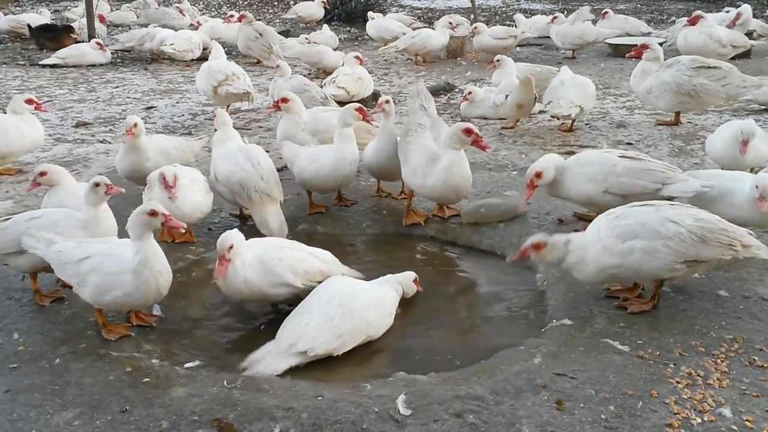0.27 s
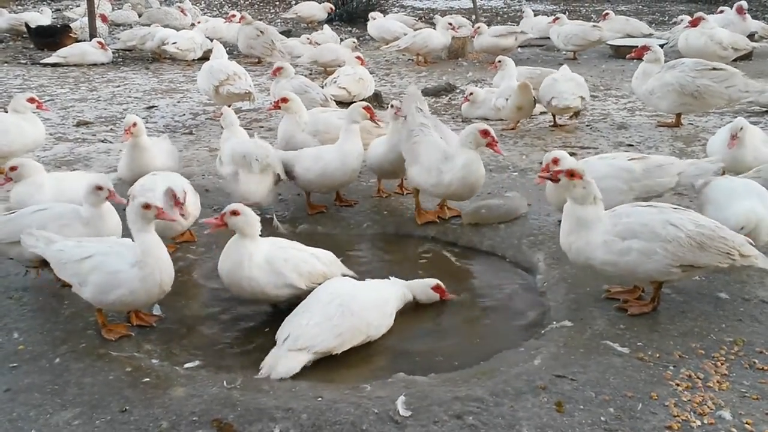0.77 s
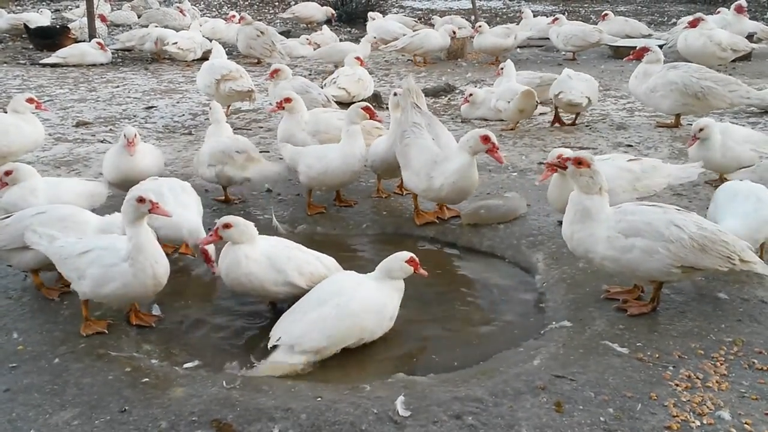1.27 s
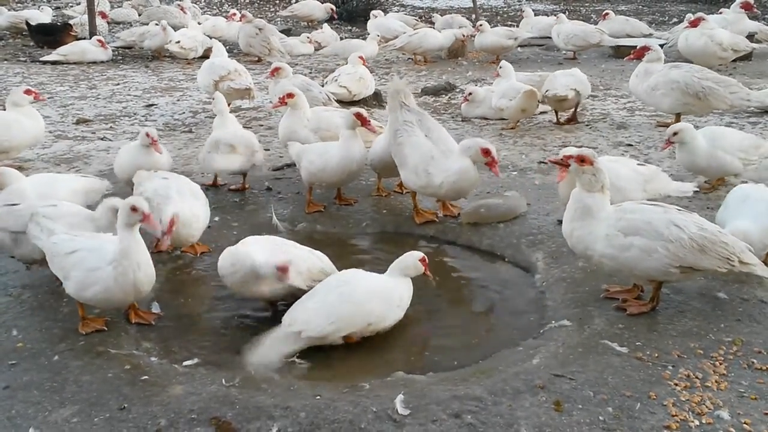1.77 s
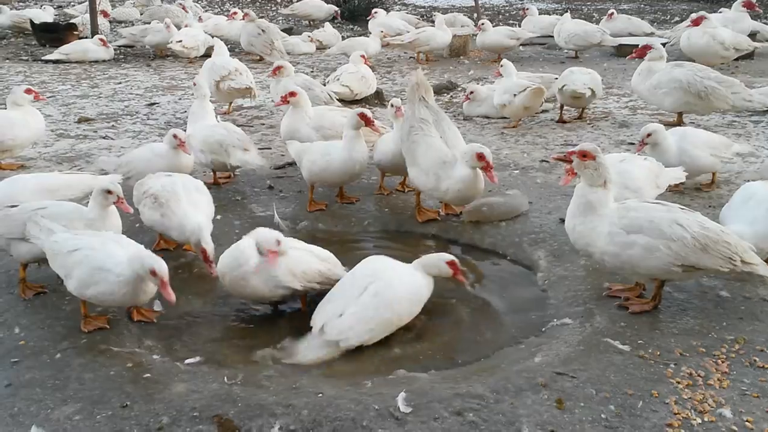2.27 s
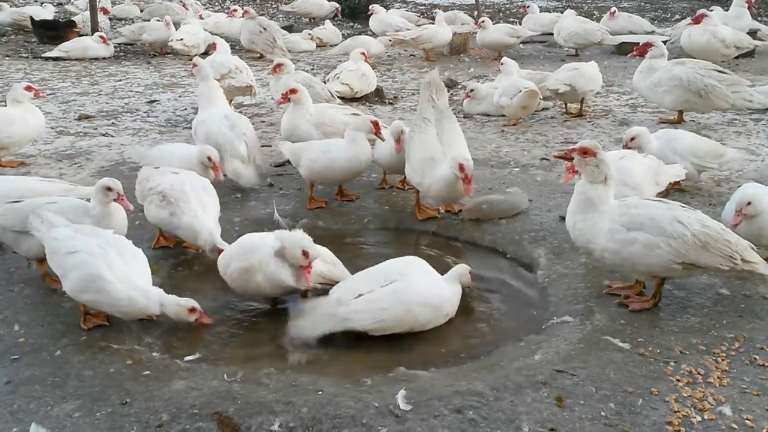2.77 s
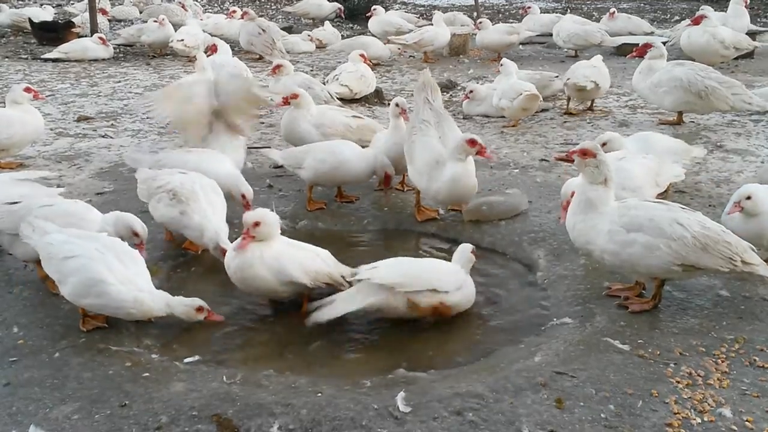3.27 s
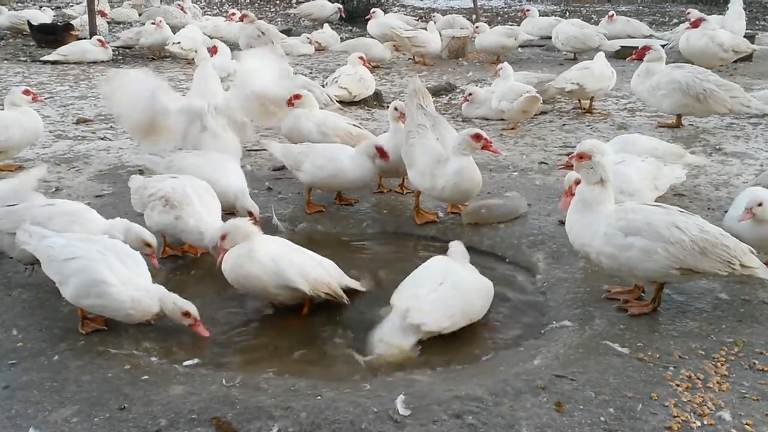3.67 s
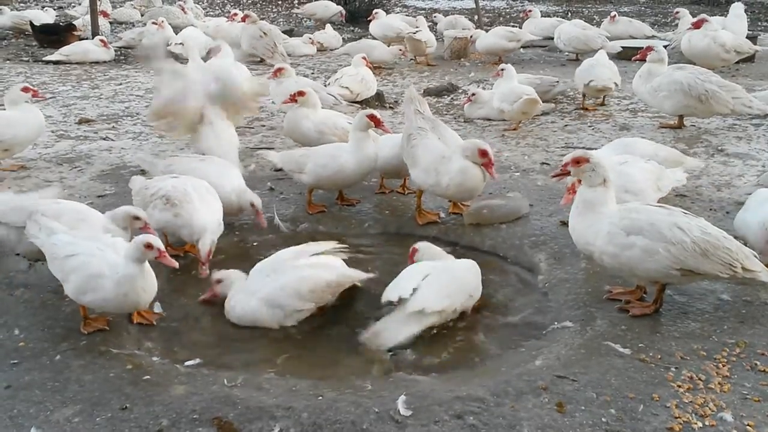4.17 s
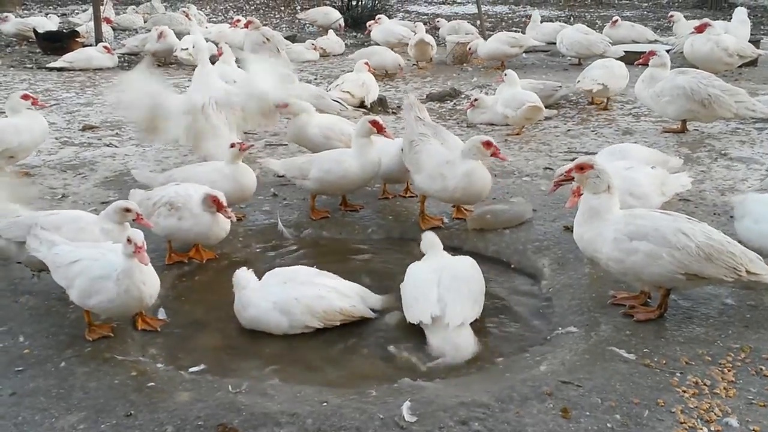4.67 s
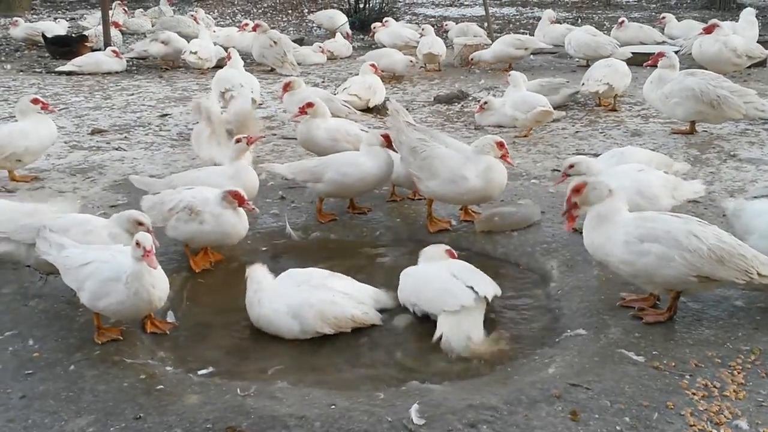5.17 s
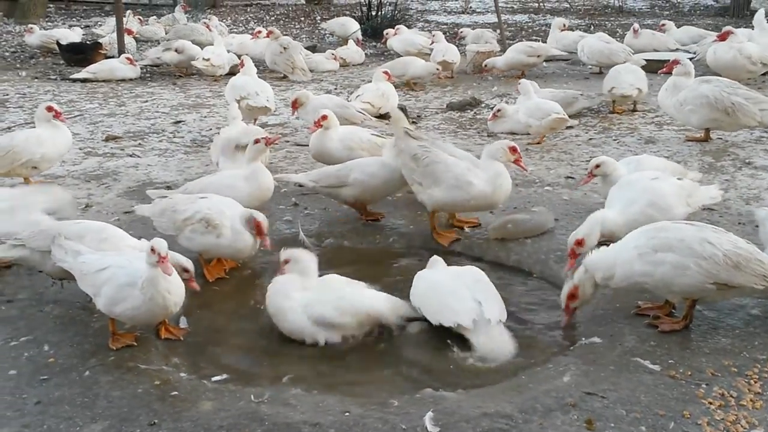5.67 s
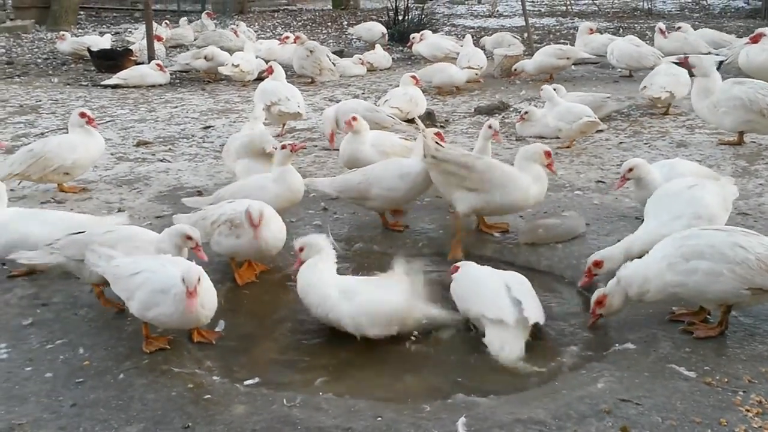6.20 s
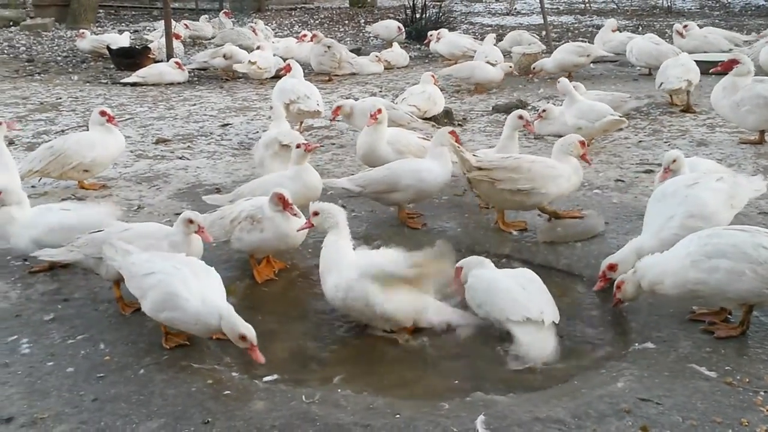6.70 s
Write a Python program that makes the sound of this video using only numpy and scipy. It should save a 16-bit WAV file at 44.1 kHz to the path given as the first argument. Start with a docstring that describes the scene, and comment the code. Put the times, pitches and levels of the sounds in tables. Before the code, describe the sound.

Sparse water ticks, tiny plops and soft wavering duck calls over a distant engine throb grow into flurries of splashing and regular bathing strokes.

```python
"""From the start drops tick, bubbles plop and feathers rustle as ducks dabble in a shallow farmyard puddle.
Ducks call softly with a few sliding overtones, and a far engine throbs as a sum of low orders.
From about 3.7 s wings puff low noise into the air and the engine slows; a quick flurry follows in the water,
where noise and swarms of ringing bubbles make the splashes. A rough drone swells near 5 s. From about 6.2 s
a duck bathes with regular wing strokes and the engine is back up to speed. Two ports colour the treble differently."""
import sys
import numpy as np
from scipy import signal
from scipy.fft import rfft, irfft, next_fast_len
from scipy.io import wavfile
from scipy.ndimage import map_coordinates

SR = 44100
rng = np.random.default_rng(int(sys.argv[2]) if len(sys.argv) > 2 else 0)


def transcribe(signal):
    """Save signal, clipped to [-1, 1], as a 16-bit WAV file at the path in sys.argv[1]."""
    frames = np.atleast_2d(signal).T
    limited = np.clip(frames, -1, 1)
    pcm = np.round(limited * 32767).astype(np.int16)
    wavfile.write(sys.argv[1], SR, pcm)


N = 306054
TIME = np.arange(N) / SR

# how hard the water is stirred: t/s, fine spray level/dB (before the mix)
STIR = [(0, -47.5), (.4, -51), (.85, -53), (1.2, -48), (1.45, -50), (2.1, -45.5), (2.5, -48), (2.85, -45.5),
        (3.2, -46.5), (4.0, -39.5), (4.35, -36.5), (4.65, -37.5), (4.92, -36), (5.12, -44), (5.38, -41),
        (5.65, -41), (6.05, -39), (6.6, -35), (6.94, -40)]
# wing strokes of the bath: t/s, length/s, spray/dB, smack/dB, thump/dB, falling water/dB (before the mix)
BATH = [(6.192, 0.026, -38, -30, -38.5, -38), (6.317, 0.01, -22.5, -29, -43.5, -42),
        (6.424, 0.014, -29, -33, -35.5, -30), (6.53, 0.024, -30.5, -29, -37.5, -35),
        (6.642, 0.02, -26.5, -23, -38, -38), (6.75, 0.0099, -25.5, -25.5, -33, -28),
        (6.861, 0.0061, -18, -28, -33, -30)]


def amp(db):
    """Level law: 20 dB is a factor of ten in amplitude."""
    return 10 ** (np.asarray(db) / 20)


def unit(x):
    """Normalisation to an effective (rms) value of 1."""
    return x / np.sqrt(np.mean(x ** 2) + 1e-20)


def curves(rows):
    """Linear interpolation: one value per sample for each column after the time."""
    s, *cols = np.transpose(rows)
    return [np.interp(TIME, s, c) for c in cols]


def wobble(rate):
    """Band-limited random modulation: a smooth curve through rate random knots a second."""
    coarse = TIME[::8]
    knots = rng.standard_normal(int(N * rate / SR) + 4)
    return np.interp(TIME, coarse, map_coordinates(knots, [coarse * rate]))


def bell(s, width):
    """Gaussian swell around time s with a standard deviation of width seconds."""
    return np.exp(-np.minimum(((TIME - s) / width) ** 2 / 2, 20))


def coloured(x, points):
    """Minimum-phase filtering: folding the cepstrum makes the response f/Hz, gain/dB causal."""
    m = 8192
    hz, db = np.transpose(points)
    gain_db = np.interp(np.log(np.fft.rfftfreq(m, 1 / SR) + 1), np.log(hz), db)
    cepstrum = irfft(np.log(amp(gain_db)))
    cepstrum[1:m // 2] *= 2
    cepstrum[m // 2 + 1:] = 0
    kernel = irfft(np.exp(rfft(cepstrum)))
    return signal.oaconvolve(x, np.broadcast_to(kernel, x.shape[:-1] + (m,)), axes=-1)[..., :N]


def noise(side_db):
    """Mid-side stereo: the level of the difference signal sets the width of white noise."""
    mid, side = rng.standard_normal((2, N))
    side = amp(side_db) * side
    return unit(np.array([mid + side, mid - side]))


def bubbles(start, size, hz, cycles, rise, lag, count):
    """Damped resonance: bubbles ring, rise in pitch and decay over some cycles, with a lag between the ports."""
    apart = lag * rng.standard_normal(len(start))
    first = (np.maximum(start - abs(apart), 0) * SR).astype(int)
    index = first[:, None] + np.arange(count)
    out = []
    for arrival in (start - apart / 2, start + apart / 2):
        turns = np.maximum(index / SR - arrival[:, None], 0) * hz[:, None]
        age = turns / np.reshape(cycles, (-1, 1))
        glide = 1 + rise * np.minimum(age, 2)
        envelope = np.exp(-age) * (1 - np.exp(-turns))
        ring = np.sin(2 * np.pi * turns * glide) * envelope
        out.append(np.bincount(index.ravel(), (size[:, None] * ring).ravel(), N)[:N])
    return np.array(out)


def swarm(rate, low_hz, high_hz, cycles, spread_db, lag, count):
    """Random superposition: a steady stream of bubbles, many faint and a few strong, of rms 1."""
    when, pitch, life, strength = rng.random((int(rate * N / SR), 4)).T
    size = amp(-spread_db * np.log(strength + .015))
    hz = low_hz * (high_hz / low_hz) ** pitch
    return unit(bubbles(when * N / SR, size, hz, cycles * (.5 + life), 0.013, lag, count))


def yard(x, t60, wet_db):
    """Diffuse reverberation: ground, birds and sheds scatter a tail that falls 60 dB in t60 seconds."""
    t = np.arange(SR // 2) / SR
    tail = rng.standard_normal((2, len(t))) * amp(-60 * t / t60) * (t > .0015)
    scattered = signal.fftconvolve(x, tail / np.linalg.norm(tail[0]), axes=1)[:, :N]
    return x + amp(wet_db) * scattered


def air():
    """Stationary filtered noise: the steady background of the yard."""
    # colour of the background: f/Hz, relative level/dB
    air_colour = [(15, 4), (35, -7), (55, 11), (100, 6), (180, 4.5), (300, -11), (550, -20), (1050, -4),
                  (1600, -28), (2600, -24), (7000, -30), (15000, -21)]
    return amp(-50.0) * unit(coloured(noise(side_db=-16), air_colour))


def engine():
    """Harmonic synthesis: low orders carry far; the second throbs, the next two swell and fade separately."""
    # speed of the distant engine: t/s, firing f/Hz
    speed = [(0, 40.7), (1.3, 41), (2.4, 40.2), (3.7, 40.4), (4.05, 34.8), (4.65, 32.9), (5.55, 34.4),
             (6.2, 41.2), (6.94, 41.8)]
    # how well it carries: t/s, level/dB (against usual_db), depth of the slow throb/dB
    reach = [(0, -49, 5.5), (.7, -49.5, 5), (1.3, -48.5, 8.5), (1.8, -49, 5.5), (2.4, -44.5, 4),
             (3.0, -48, 8), (3.28, -43.5, -4.5), (3.72, -62, 15), (4.1, -44.5, 0), (5.6, -51, -2),
             (5.95, -44.5, -4), (6.5, -43.5, 3.5), (6.94, -49.5, -3)]
    # third order: t/s, level/dB
    third_order = [(.2, -45), (.35, -55), (1.55, -54), (1.8, -43.5), (2.25, -53), (2.5, -46.5), (2.7, -52),
                   (3.15, -45), (3.6, -55)]
    # fourth order: t/s, level/dB
    fourth_order = [(0, -49), (1.15, -57), (1.33, -43.5), (1.58, -45), (2.25, -57), (2.95, -48), (3.9, -56),
                    (6.2, -51)]
    usual_db, second_order_db = -48, -45.5
    throb_period_s, throb_peak_s = .565, .14
    hz, = curves(speed)
    level_db, depth_db = curves(reach)
    throb = np.cos(2 * np.pi * (TIME - throb_peak_s) / throb_period_s)
    second_db = second_order_db + level_db - usual_db + depth_db * throb
    phase = 2 * np.pi * np.cumsum(hz * (1 + 0.0026 * wobble(14))) / SR
    # orders two to seven
    levels = [second_db] + curves(third_order) + curves(fourth_order) + [-66, -63, -62]
    return sum(amp(db + 1.2 * wobble(10)) * np.sin(order * phase) for order, db in enumerate(levels, 2))


def bath():
    """Impact and fallback: each wing slap is followed by falling water, as t, length, spray, smack, thump."""
    delay_s, length_s = 0.011, 0.026
    under_db = (-1, -18)  # smack and thump of the falling water, relative to its spray
    rows = []
    for *stroke, fall_db in BATH:
        rows.append(stroke)
        rows.append((stroke[0] + delay_s, length_s, fall_db, *np.add(under_db, fall_db)))
    return rows


def slaps(attack, release):
    """Energy addition: powers of spray, smack and thump sum as each slap starts sharply, lasts and decays."""
    # slaps of body, foot or wing: t/s, length/s, spray/dB, smack/dB, thump/dB (before the mix)
    splash_rows = [(0.029, .003, -31, -33, -64), (0.107, 0.0043, -56, -34, -65),
                   (2.026, 0.061, -37.5, -41.5, -76), (2.094, 0.0096, -22, -24.5, -54),
                   (2.143, 0.0091, -63, -38, -58), (2.167, 0.0042, -61, -34.5, -63),
                   (2.789, .025, -37.5, -40, -65), (2.947, 0.0055, -53, -34, -62),
                   (2.995, 0.0056, -64, -34, -52), (3.261, 0.016, -37.5, -35, -52),
                   (3.311, 0.0053, -41, -33, -63), (3.355, 0.032, -35.5, -35, -62),
                   (3.51, 0.022, -44, -41, -50), (3.715, 0.007, -30, -32, -42.5),
                   (4.099, 0.028, -39, -38.5, -43.5), (4.173, 0.0074, -30, -28, -40),
                   (4.194, 0.0093, -31, -29, -55), (4.265, 0.023, -38, -37, -53),
                   (4.293, 0.0064, -26, -33.5, -38.5), (4.342, 0.019, -33.5, -37, -41),
                   (4.392, 0.0073, -31, -39, -36.5), (4.462, 0.036, -35.5, -31, -46.5),
                   (4.53, 0.0083, -21, -27, -32.5), (4.578, 0.01, -34, -33.5, -39.5),
                   (4.643, 0.01, -26, -36, -40), (4.713, 0.0088, -25.5, -26, -38),
                   (4.767, 0.018, -32, -35.5, -43), (4.827, 0.013, -28.5, -31.5, -41),
                   (4.866, 0.032, -31, -35.5, -43), (4.938, 0.034, -33.5, -39, -52),
                   (4.98, 0.0034, -33, -25.5, -44), (5.013, 0.016, -31.5, -35, -43),
                   (5.083, 0.013, -32, -35, -40), (5.156, .022, -37.5, -51, -47.5),
                   (5.218, 0.0091, -31, -40, -42), (5.298, 0.0099, -34.5, -37.5, -49),
                   (5.354, 0.0099, -37, -52, -46), (5.626, 0.01, -32, -38, -56),
                   (5.851, 0.029, -35, -34, -57), (6.028, 0.01, -61, -30.5, -60),
                   (6.081, 0.0028, -46, -32, -29), (6.111, 0.01, -32.5, -43, -42)]
    power = np.zeros((3, N))
    for s, length, *levels in [*splash_rows, *bath()]:
        near = slice(max(int((s - .01) * SR), 0), int((s + .15) * SR))
        t = TIME[near] - s
        onset = np.clip(t / attack, 0, 1)
        decay = np.exp(-np.maximum(t - .7 * length, 0) / (release + .35 * length))
        power[:, near] += (amp(levels)[:, None] * onset * decay) ** 2
    return power


def water():
    """Bubble and turbulence noise: stirring and slaps throw spray, shake up bubbles and push the water below."""
    # deep churning: t/s, level/dB (before the mix)
    churn_rows = [(0, -57), (2.5, -57), (3.7, -54), (4.15, -46.5), (4.6, -44), (4.92, -44.5), (5.15, -55),
                  (6.3, -46), (6.94, -50)]
    # fine spray: f/Hz, relative level/dB
    spray_colour = [(1200, -33.5), (2700, -3), (3800, -9), (6500, 7), (9000, 1), (15000, -5)]
    # sloshing with larger bubbles: f/Hz, relative level/dB
    slosh_colour = [(300, 3.5), (650, -2), (1100, 4.5), (1900, 9), (2600, 7), (4500, -4.5)]
    # hollow smack of a slap: f/Hz, relative level/dB
    smack_colour = [(250, -37), (560, -2.5), (800, -1), (1100, 4.5), (1900, 1), (2600, -5), (4500, -9.5)]
    # deep push of the water: f/Hz, relative level/dB
    thump_colour = [(40, -36), (110, 4.5), (200, -1), (340, 1.5), (470, -4.5), (600, -0.5), (850, -12.5),
                    (1800, -25.5)]
    # water where the bathing duck sits: f/Hz, gain/dB
    bath_colour = [(2200, -0.5), (2700, -5.5), (3300, 0.5), (8000, 2), (9000, -6), (9900, 0.5)]
    bath_turn_s = (5.3, 6.1)  # the bath colour takes over during this span

    spray_db, churn_db = curves(STIR) + curves(churn_rows)
    # sloshing lies under the spray at a middling stir and grows more slowly
    stir_mid_db, slosh_under_db, slosh_grows = -48.5, -11.5, 0.79
    slosh_db = stir_mid_db + slosh_under_db + slosh_grows * (spray_db - stir_mid_db)
    # the bathing duck settles in before its first stroke and keeps the water sloshing
    bath_slosh_db, bath_lead_s = 5.5, 0.59
    slosh_db = slosh_db + bath_slosh_db * np.clip(1 + (TIME - BATH[0][0]) / bath_lead_s, 0, 1)

    ticks = swarm(rate=550, low_hz=3200, high_hz=12500, cycles=3.2, spread_db=4.7, lag=.00005, count=160)
    ticks = unit(coloured(ticks + amp(-3) * noise(side_db=8), spray_colour))
    sheet = swarm(rate=3200, low_hz=3000, high_hz=12400, cycles=4, spread_db=4.3, lag=.00004, count=96)
    sheet = unit(coloured(sheet + amp(-2) * noise(side_db=-2), spray_colour))
    gurgle = swarm(rate=800, low_hz=650, high_hz=2400, cycles=3.8, spread_db=3.2, lag=.00006, count=560)
    gurgle = unit(coloured(gurgle + amp(2) * noise(side_db=-4), slosh_colour))
    smack = unit(coloured(noise(side_db=-6.5), smack_colour))
    churn, thump = (unit(coloured(noise(side_db=-10.5), thump_colour)) for _ in range(2))

    # as the water gets busier, separate ticks merge into a sheet of spray
    merged = np.clip((spray_db + 53) / 14, 0, .85)
    patter = np.sqrt(1 - merged) * ticks + np.sqrt(merged) * sheet
    # water falls back in clumps, and a slapped sheet tears into brief bursts
    clumps = unit(amp(2.3 * wobble(150)))
    bursts = unit(amp(3 * wobble(650)))
    stirred = clumps * (amp(spray_db - 3.0) * patter + amp(slosh_db + 5.0) * gurgle)
    stirred = stirred + amp(churn_db + 0.5) * churn
    spray_slap, smack_slap, thump_slap = np.sqrt(slaps(attack=.0015, release=.002))
    slapped = bursts * (amp(-6.0) * spray_slap * sheet + amp(-4.0) * smack_slap * smack)
    splash = stirred + slapped + amp(4.5) * thump_slap * thump
    bathing = np.interp(TIME, bath_turn_s, [0, 1])
    return (1 - bathing) * splash + bathing * coloured(splash, bath_colour)


def flock():
    """Random superposition: ducks farther back give faint arched calls, as curves of t, f, level."""
    calls_per_s, call_s, top_hz, level_db = 5, .11, 1080, -58
    when, pitch = rng.random((int(calls_per_s * N / SR), 2)).T
    start = when * (N / SR - call_s)
    base_hz = top_hz * (1 - .2 * pitch)
    arch = [(0, 1), (.5, 1.2), (1, 1)]  # part of the call, pitch factor
    return [[(s + part * call_s, hz * lift, level_db) for part, lift in arch]
            for s, hz in zip(start, base_hz)]


def whistles():
    """Source and filter: a narrow throat passes a few overtones around the sixth of a voice near 200 Hz."""
    # soft, undulating duck calls, one curve each: t/s, strongest overtone f/Hz, level/dB (before the mix)
    call_curves = [
        [(0, 1015, -45), (.04, 1217, -45), (.09, 1600, -45), (.125, 1580, -50), (.155, 1145, -40),
         (.19, 1620, -50)],
        [(.31, 1022, -39), (.335, 1287, -49), (.37, 1047, -45), (.42, 1210, -47.5), (.46, 1090, -51)],
        [(.55, 947, -52), (.595, 1422, -46), (.642, 1650, -45), (.68, 1520, -42), (.705, 1096, -47),
         (.733, 890, -43)],
        [(.65, 966, -57), (.685, 1070, -47), (.72, 956, -51)],
        [(.738, 990, -47), (.762, 1210, -40), (.783, 1100, -45.5), (.802, 1208, -42), (.822, 1110, -49),
         (.843, 1195, -44), (.862, 1030, -49), (.893, 1363, -47), (.917, 1233, -45), (.94, 1520, -48)],
        [(.952, 1120, -40), (.985, 1535, -57), (1.004, 1030, -41), (1.012, 990, -50), (1.03, 1188, -52),
         (1.07, 1325, -50)],
        [(1.19, 1000, -51), (1.245, 1260, -49), (1.272, 990, -45), (1.303, 1400, -49), (1.333, 1000, -48)],
        [(1.86, 1310, -55), (1.902, 950, -47), (1.945, 1330, -52), (1.98, 990, -55)],
        [(2.655, 1090, -73), (2.685, 993, -40), (2.705, 1120, -72)],
        [(2.96, 1120, -49), (2.99, 1226, -50), (3.03, 943, -39), (3.07, 1334, -55)],
        [(3.345, 1056, -58), (3.375, 1272, -41), (3.405, 1024, -49), (3.435, 1212, -48), (3.46, 1010, -51)],
        [(3.572, 1176, -42), (3.598, 1470, -42), (3.625, 1250, -57)],
    ]
    out = np.zeros(N)
    order = np.arange(4, 9)[:, None] / 6  # relative to the sixth overtone
    # the pitch wavers and trembles, and each overtone breaks up in its own way
    quaver = 1 + .012 * wobble(70) + .012 * wobble(260)
    husk = unit(amp(2.4 * np.array([wobble(90) for _ in order]) + 1.3 * wobble(300)))
    # a faint rasp and octave lie beside the strongest overtone
    rasp = amp(-13) * wobble(600)
    octave_db = -25
    for call in [*call_curves, *flock()]:
        s, pitch, level = np.transpose(call)
        on = slice(max(int(s[0] * SR), 0), int(s[-1] * SR))
        t = TIME[on]
        hz, db = np.interp(t, s, pitch), np.interp(t, s, level)
        gate = np.clip(np.minimum(t - s[0], s[-1] - t) / 0.0023, 0, 1)
        throat = np.where(order == 1, 1, amp(-9) / (1 + ((order * hz - 1250) / 380) ** 4))
        phase = 2 * np.pi * np.cumsum(hz * quaver[on]) / SR
        partials = throat * husk[:, on] * np.sin(order * phase)
        voice = partials.sum(0) + rasp[on] * np.cos(phase) + amp(octave_db) * np.sin(2 * phase)
        out[on] += gate * amp(db - 0.5) * voice
    return np.array([out, out])


def drips():
    """Random arrivals: further drops fall at random from bills and feathers, harder in busier water."""
    drips_per_s, over_spray_db, scatter_db, mid_hz = 8, 12, 3, 6840
    when, pitch, strength = rng.random((int(drips_per_s * N / SR), 3)).T
    s = when * N / SR
    db = np.interp(s, *np.transpose(STIR)) + over_spray_db + scatter_db * (2 * strength - 1)
    return np.column_stack([s, db, mid_hz * (1 + .15 * (2 * pitch - 1))])


def drops():
    """Impact, then resonance: a drop ticks on the surface; its bubble pinches off and rings a millisecond or so."""
    # single drops, each trapping a tiny bubble: t/s, level/dB (before the gains below), bubble f/Hz
    drop_rows = [(0.011, -30, 4120), (0.0297, -11, 6140), (0.0473, -20, 6740), (0.1256, -22.5, 6700),
                 (1.0825, -16.5, 6700), (1.2346, -14.5, 6650), (1.268, -15.5, 7100), (1.307, -17, 7100),
                 (1.4571, -23.5, 7000), (1.9094, -18, 6800), (1.9711, -19, 7200), (2.111, -10.5, 6080),
                 (2.367, -15, 7270), (2.5243, -22.5, 6230), (2.7556, -20.5, 6700), (3.3203, -26.5, 3360),
                 (3.4538, -14, 6250), (3.5498, -18.5, 6100), (3.6005, -21.5, 6100), (3.63, -20.5, 5930),
                 (3.9045, -18.5, 6160), (4.6483, -20, 5880), (4.7173, -15.5, 7440), (5.0485, -35, 3900),
                 (5.4231, -16, 7100), (5.488, -24, 5980), (5.537, -19, 6440), (5.5765, -16, 6650),
                 (5.7116, -20, 7000), (5.7768, -13, 6860), (6.2023, -9, 6150), (6.2087, -9, 7620),
                 (6.2801, -16, 6540), (6.324, -11, 6900), (6.366, -25, 6400), (6.4348, -25, 6040),
                 (6.459, -22, 6380), (6.6533, -13.5, 6500), (6.753, -14, 5600), (6.818, -20, 6610),
                 (6.865, -10.5, 7130), (6.8973, -14, 6900)]
    s, db, hz = np.vstack([drop_rows, drips()]).T
    life = rng.uniform(4, 7, len(s))
    ring = bubbles(s - .0003, amp(db + 4.2), hz, life, rise=.01, lag=.00002, count=400)
    tick = bubbles(s - .0011, amp(db + 3.7), hz, cycles=1.1, rise=0, lag=.00002, count=80)
    return ring + tick


def plops():
    """Volume resonance: larger pockets of air ring lower and longer, and chirp upward as they surface."""
    # large bubbles from bills and feet: t/s, level/dB (before the gain below), f/Hz amid the upward chirp
    plop_rows = [(0.378, -37, 2000), (1.528, -34, 1920), (1.571, -30, 2120), (1.6298, -39, 1780),
                 (2.572, -33, 2020), (2.834, -37, 1650), (3.3112, -23, 1783), (3.5722, -30.5, 1780),
                 (3.667, -35, 1670), (3.7797, -32.5, 1300), (3.823, -28.5, 1990), (3.958, -31.5, 2240),
                 (4.137, -31, 1840), (4.789, -32, 2170), (4.945, -28.5, 1680), (5.128, -31.5, 1600),
                 (5.865, -30, 2000), (6.41, -29, 1040), (6.44, -32, 2210), (6.567, -31, 1295),
                 (6.775, -28, 2010), (6.791, -30, 1970), (6.8923, -26, 1166)]
    s, db, hz = np.transpose(plop_rows)
    start_hz = hz * .92
    return bubbles(s - .0015, amp(db + 4), start_hz, cycles=6, rise=.05, lag=.00004, count=1400)


def feathers():
    """Friction noise: barbs rub over each other in short, high, grainy swishes."""
    # wet feathers shaken and preened: mid t/s, standard deviation/s, level/dB (before the gain below)
    rustle_rows = [(0.477, 0.0097, -53.5), (1.26, 0.031, -55), (1.391, 0.012, -48), (1.776, 0.019, -45),
                   (1.839, 0.01, -46.5), (1.907, 0.03, -47), (2.28, 0.011, -47.5), (2.798, 0.032, -54)]
    # swish of feathers: f/Hz, relative level/dB
    swish_colour = [(3000, -22), (5500, -8), (7500, 4), (9500, -14.5), (15000, -11)]
    strokes = sum(amp(db) * bell(s, width) for s, width, db in rustle_rows)
    grain = amp(4 * wobble(400))
    barbs = unit(coloured(noise(side_db=-3), swish_colour) * grain)
    return amp(8.0) * strokes * barbs


def clicks():
    """Strong damping: short, dry, bright clicks that hardly ring."""
    # bright clicks, of bills or of drops hitting the water: t/s, level/dB (before the gain below)
    click_rows = [(.5524, -28), (.6462, -30), (.6986, -32), (1.0593, -24), (1.2333, -20), (1.3047, -21),
                  (1.4479, -26), (1.831, -14.5), (2.7554, -34), (2.8193, -13.5), (3.4349, -20),
                  (3.5316, -21), (3.9657, -25), (5.2205, -16), (5.488, -16), (5.922, -12)]
    s, db = np.transpose(click_rows)
    hz = np.full(len(s), 10500)
    return bubbles(s, amp(db + 3), hz, cycles=1.3, rise=0, lag=.00002, count=64)


def peeps():
    """Frequency glide: tiny chirps slide down in pitch under a half-sine envelope."""
    # falling chirps: t/s, length/s, from f/Hz, to f/Hz, level/dB (before the gain below)
    peep_rows = [(0.872, 0.017, 3270, 2600, -45), (1.064, .011, 3220, 2580, -53),
                 (2.697, .012, 2600, 2320, -48)]
    out = np.zeros(N)
    for s, length, from_hz, to_hz, db in peep_rows:
        t = np.arange(int(length * SR)) / SR
        envelope = amp(db - 1.5) * np.sin(np.pi * t / length)
        out[int(s * SR):][:len(t)] += envelope * signal.chirp(t, from_hz, length, to_hz)
    return np.array([out, out])


def wings():
    """Flow noise: each downstroke in the air shoves out a low puff."""
    # wing beats in the air: t/s, level/dB
    beat_rows = [(3.719, -45), (4.15, -43.5), (4.34, -43), (4.539, -37.5), (4.72, -32), (4.9, -39),
                 (5.09, -50)]
    # puff of a wing stroke: f/Hz, relative level/dB
    puff_colour = [(70, -11), (125, 3), (180, -1), (260, -8), (500, -29)]
    strokes = sum(amp(db) * bell(s, 0.025) for s, db in beat_rows)
    return strokes * unit(coloured(noise(side_db=-30), puff_colour))


def hum():
    """Random phase and amplitude modulation roughen a drone that swells briefly."""
    swell = amp(-48.5 + 2.7 * wobble(25)) * np.exp(-((TIME - 5.02) / 0.58) ** 2)
    return swell * np.sin(2 * np.pi * 338 * TIME + 1.2 * wobble(25))


def gulps():
    """Cavity resonance: a hollow behind a wing or body closes with a short, low note."""
    # gulps: t/s, level/dB (before the gain below), f/Hz
    gulp_rows = [(4.581, -29.5, 293), (4.959, -32, 301), (5.169, -33, 330), (5.227, -38, 328),
                 (6.205, -23, 592), (6.648, -29, 330), (6.754, -23, 550)]
    s, db, hz = np.transpose(gulp_rows)
    return bubbles(s - .002, amp(db + 2), hz, cycles=3.5, rise=0, lag=0, count=3000)


def scene():
    """Linear superposition of the puddle, the calls and the distant sounds."""
    struck = drops() + amp(-1) * plops() + clicks()
    near = water() + gulps() + feathers() + yard(struck, t60=.025, wet_db=-15)
    puddle = yard(near, t60=.15, wet_db=-17)
    calls = yard(whistles() + peeps(), t60=.2, wet_db=-13)
    balance = amp([[.4], [-.4]])  # slightly to the left
    return puddle + calls + (wings() + engine() + hum() + air()) * balance


def record(dry):
    """Linear filtering: each port has its own resonances, the left hears later, and the top rolls off steeply."""
    # left microphone port: f/Hz, gain/dB
    left_port = [(1000, -1), (2200, -1), (2750, -2), (3400, 6.5), (4100, 8.5), (5200, -7), (5700, 8.5),
                 (6400, 2), (7200, 3.5), (8400, -6), (11500, -6.5), (14400, -4.5)]
    # right microphone port: f/Hz, gain/dB
    right_port = [(1000, -2.5), (2200, 1.5), (2750, 0), (3400, 1), (4500, 9), (5400, -1.5), (7100, 5),
                  (8500, 6), (10000, 5), (11200, 8), (13200, -2.5), (14400, -0.5)]
    ports = np.array([coloured(dry[0], left_port), coloured(dry[1], right_port)])
    m = next_fast_len(N + 8192)
    hz = np.fft.rfftfreq(m, 1 / SR)
    delay_s = np.array([[.00003], [0]])
    delay = np.exp(-2j * np.pi * hz * delay_s)
    top = (hz < 15800) / np.sqrt(1 + (hz / 14550) ** 140)
    return irfft(rfft(ports, m) * delay * top, m)[:, :N]


dry = scene()
out = record(dry)
transcribe(out)
```